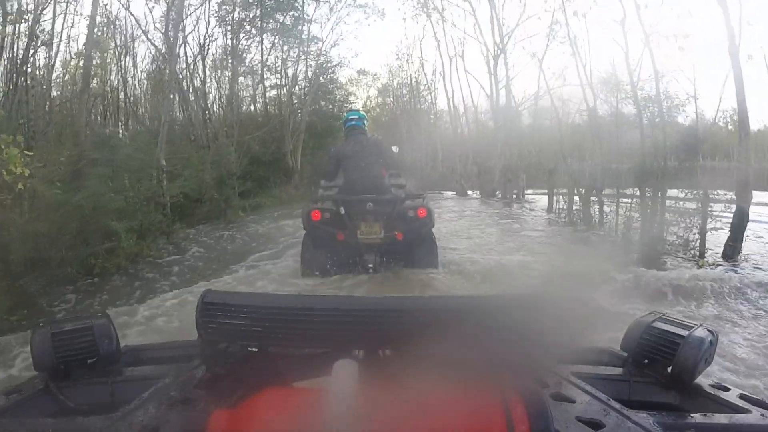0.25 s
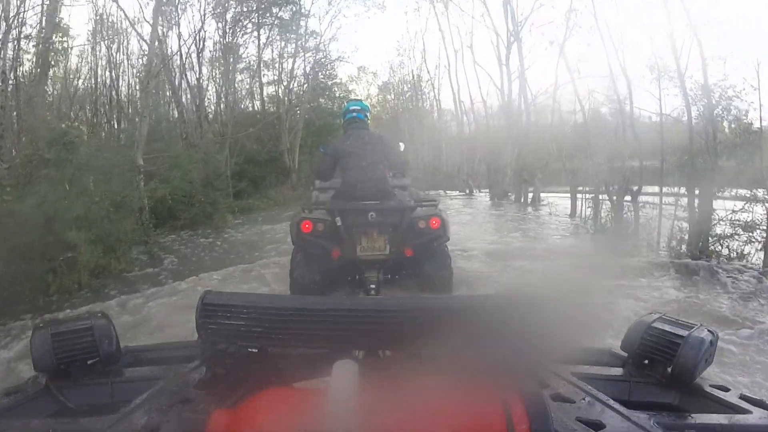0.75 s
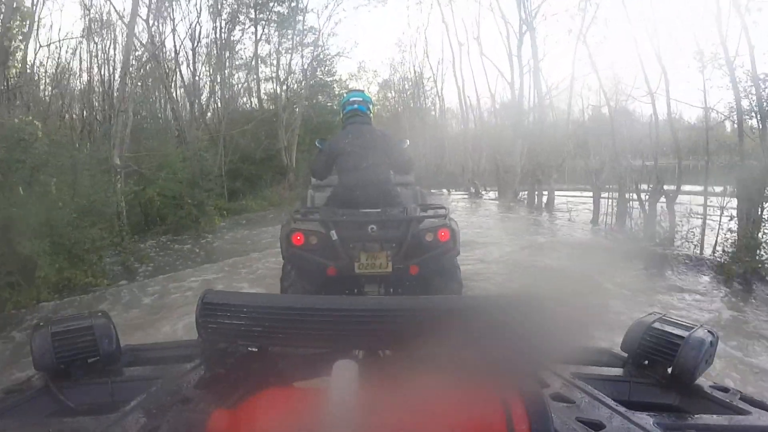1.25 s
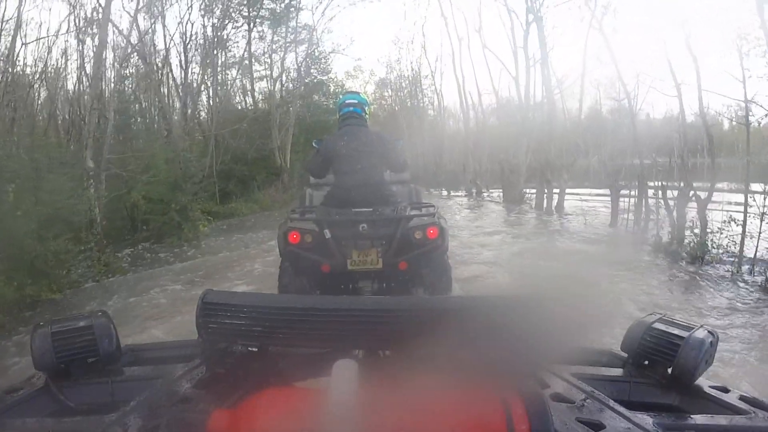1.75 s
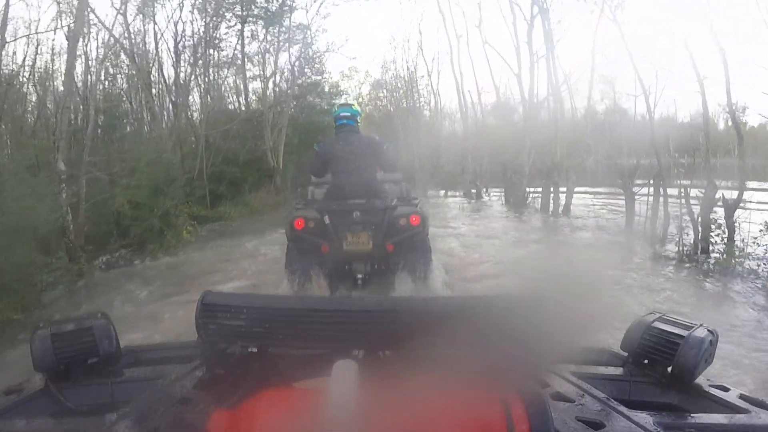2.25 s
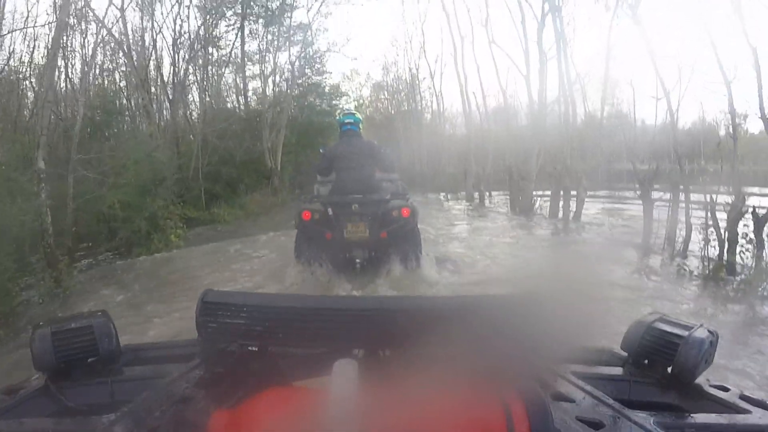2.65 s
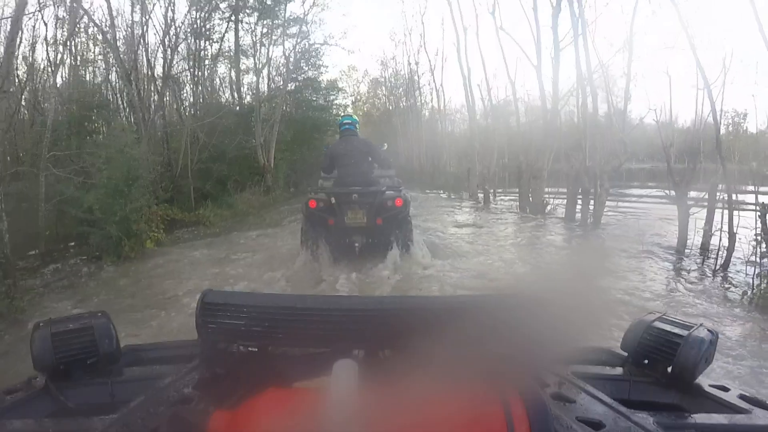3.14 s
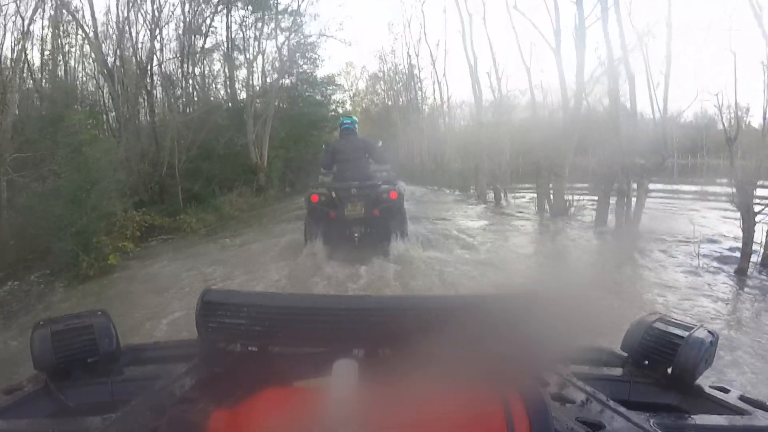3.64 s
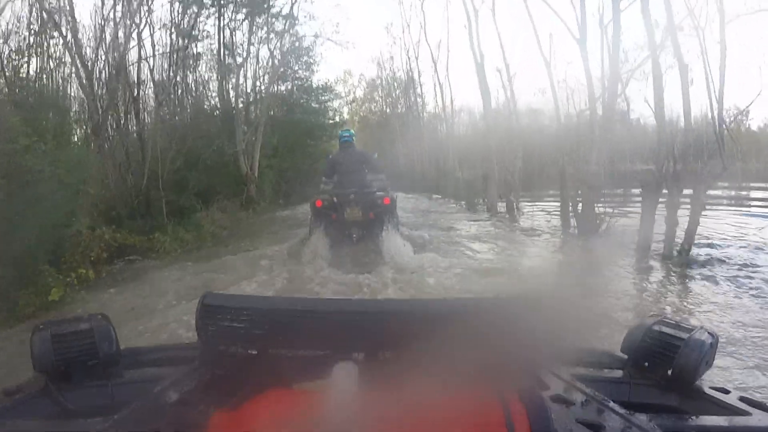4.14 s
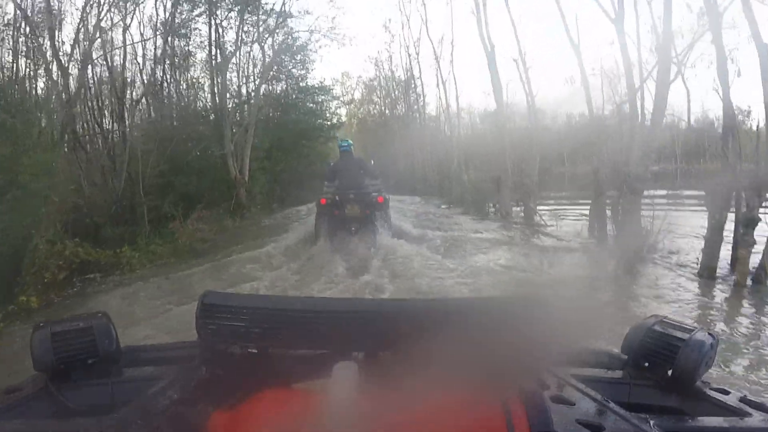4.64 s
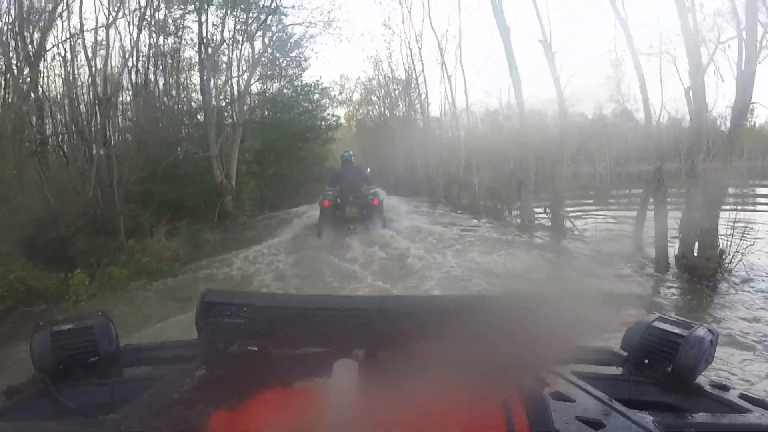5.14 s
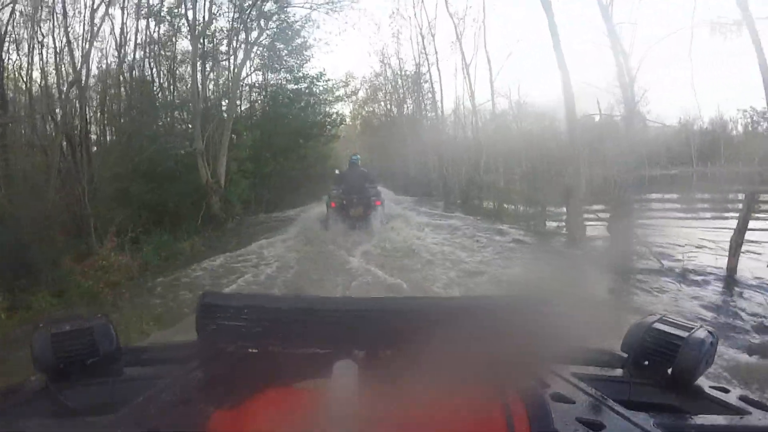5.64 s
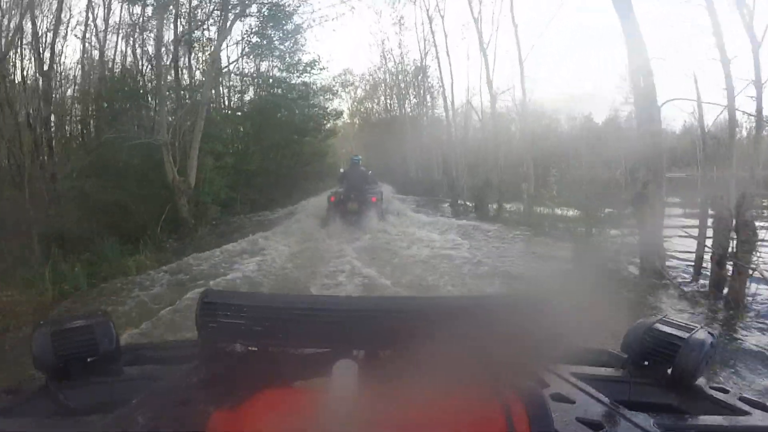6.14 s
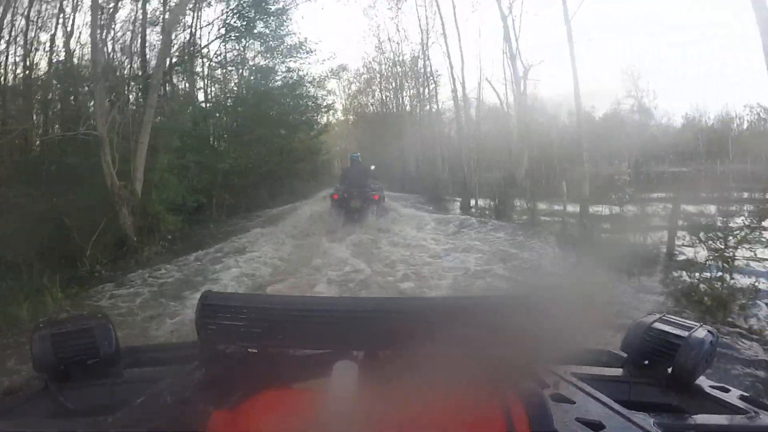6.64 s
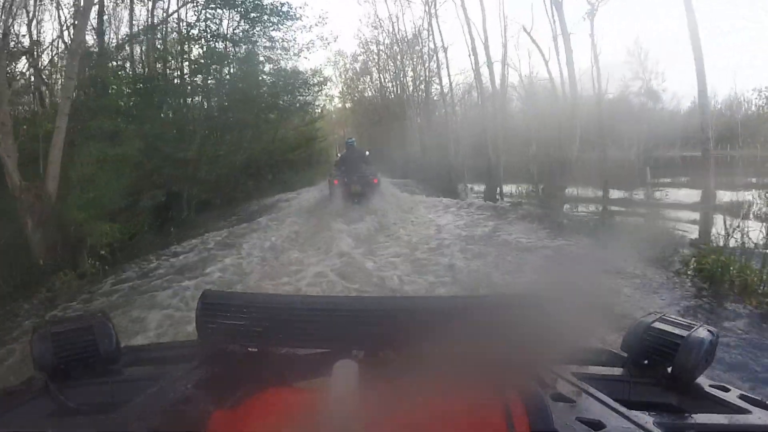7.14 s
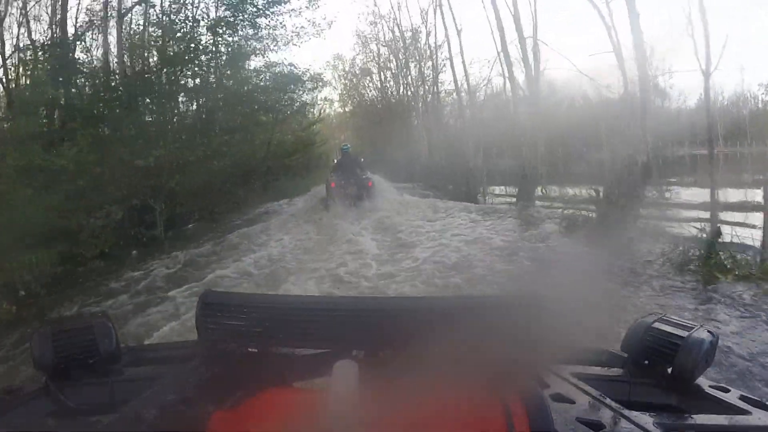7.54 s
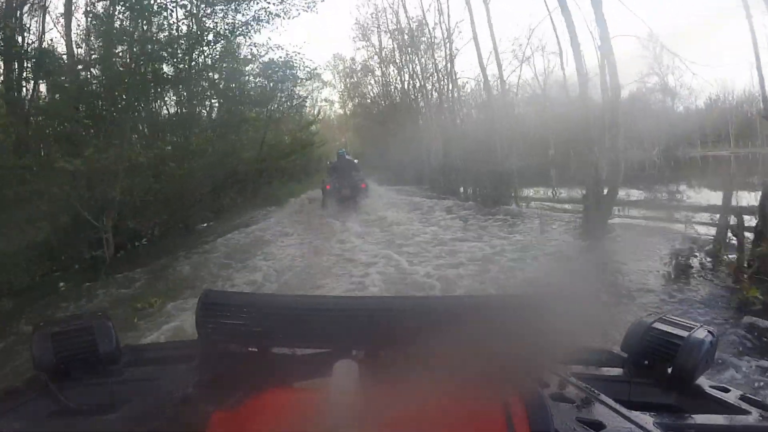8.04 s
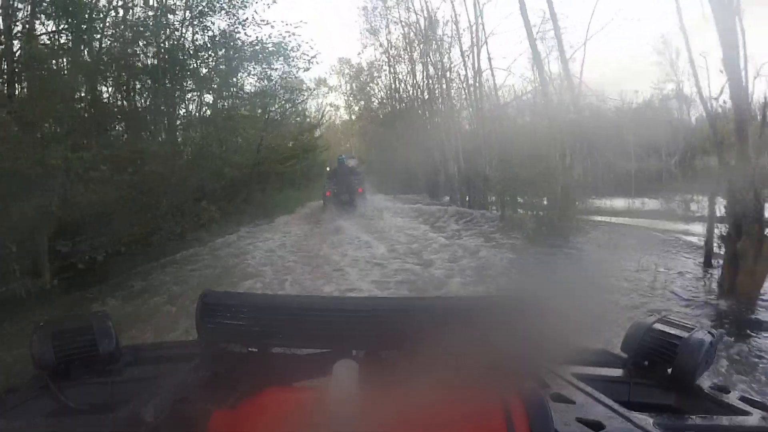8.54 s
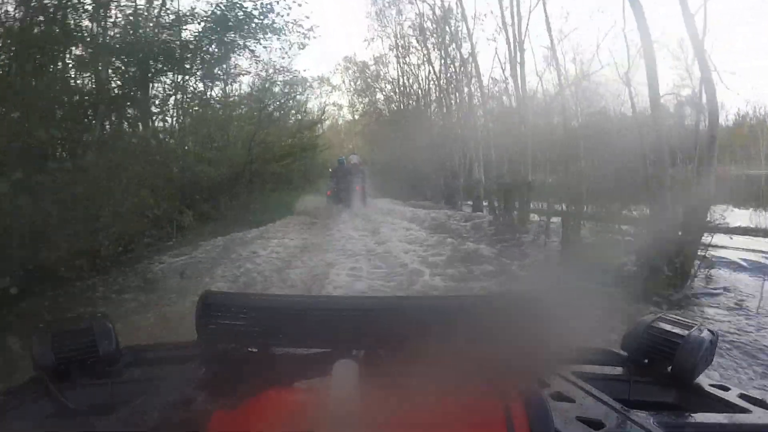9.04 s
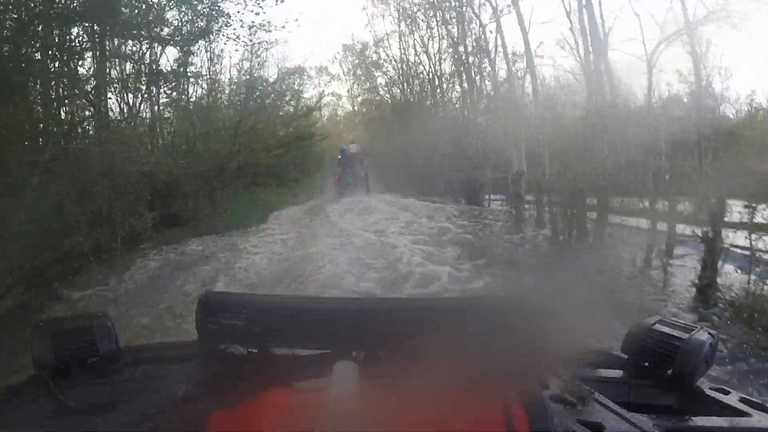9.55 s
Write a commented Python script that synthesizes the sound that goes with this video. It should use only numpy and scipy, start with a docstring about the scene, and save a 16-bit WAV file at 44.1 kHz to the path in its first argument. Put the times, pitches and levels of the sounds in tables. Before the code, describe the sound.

Close and muffled, from inside a sealed case fixed to a quad bike: a low, uneven idle thumps with metallic engine clatter and loose ticking for about two seconds. Then the drive grips and the engine smooths into a strong bass drone, rising steadily. Water rumbles and washes around the machine, with dull thuds and a rough gear whine joining from about five seconds outdoors on a flooded trail.

```python
"""A lumpy idle thumps first, with clatter and loose ticks; the clutch grips and a twin-cylinder quad bike
speeds up through floodwater. Harmonics of the engine cycle shake the frame; gated noise and struck notes
ring the engine cover; shaped noise is rumble, wash and water thuds; phase-modulated tones are gear whine.
The capsule sits in a sealed case bolted to the frame: resonances of the case colour wash and whine, and
the loose case rattles in its mount as impulses shaped into noisy ticks."""
import sys
import numpy as np
from scipy import signal
from scipy.fft import rfft, irfft, next_fast_len
from scipy.io import wavfile
from scipy.ndimage import uniform_filter1d, map_coordinates

SR = 44100
rng = np.random.default_rng(int(sys.argv[2]) if len(sys.argv) > 2 else 0)


def master_out(mix):
    """Clip the mix to full scale and print it as 16-bit PCM to the path in sys.argv[1]."""
    frames = np.transpose(np.atleast_2d(mix))
    ceiling = np.clip(frames, -1, 1)
    pcm = np.round(ceiling * 32767).astype(np.int16)
    wavfile.write(sys.argv[1], SR, pcm)


N = 431738

# Engine cycles, each of two crank turns: (t/s, f/Hz)
CYCLE_RATE = [(0.0, 13.699), (0.5, 11.365), (0.875, 13.134), (1.125, 12.37), (1.625, 12.172),
              (1.875, 10.928), (2.375, 15.518), (2.875, 17.96), (4.125, 16.155), (4.75, 17.637),
              (5.0, 19.599), (5.625, 21.874), (6.375, 26.129), (6.5, 27.109), (7.375, 28.465),
              (7.5, 27.993), (8.0, 27.421), (8.625, 28.767), (9.0, 30.197), (9.79, 32.363)]
# Source levels before fixed offsets: (t/s, frame shake level/dB, clatter level/dB, rattle level/dB)
SOURCE_LEVELS = [(0, -17.5, -42, -41), (.3, -13, -37.5, -49), (.9, -11.5, -37.5, -38.5),
                 (1.6, -12.5, -35.5, -47), (2.1, -10.5, -37, -44.5), (2.4, -8.5, -43.5, -46.5),
                 (2.7, -12, -43, -57), (3.9, -10, -40.5, -51), (4.5, -12.5, -41.5, -54.5),
                 (5.3, -10.5, -42.5, -47), (5.7, -9, -57, -45), (6, -12.5, -64, -46.5),
                 (6.5, -12, -48, -50), (7.7, -12.5, -53.5, -48.5), (8.4, -12, -50, -49),
                 (8.9, -11, -43.5, -47.5), (9.79, -12.5, -41.5, -47)]
# Engine load: (t/s, clutch grip 0-1, thump place/cycle, thump shape/turn, clatter place/cycle, sharpness)
ENGINE_LOAD = [(0, 0.16, 0.074, 0.33, -0.039, 1.1), (2.05, 0, 0.53, 0.21, -0.014, 2.4),
               (2.35, 0.93, 0.25, 0.49, -0.22, 4.5), (4.7, 0.99, 0.26, 0.46, -0.17, 2.8),
               (5.6, 0.93, 0.3576, 1, -0.32, 2), (8.5, 1, 0.34, 0.97, -0.12, 1.4),
               (9.79, 0.79, 0.39, 0.98, -0.21, 1.2)]
# Relative engine orders: (multiple of cycle rate, idle level/dB, then in gear: slow, cruising, fast level/dB)
ENGINE_ORDERS = [(1, -30, -10, -14, -8.5), (2, -5.5, 0, 0, 0), (3, -5, -12, -7.5, -4),
                 (4, -1, -8.5, -11.5, -12), (5, -2, -22, -22.5, -18), (6, -13, -15.5, -18, -17),
                 (7, -9.5, -24, -21.5, -24), (8, -8, -22, -21, -20.5), (9, -25, -25, -24.5, -22),
                 (10, -27, -30, -27.5, -25), (11, -24, -32, -32, -32), (12, -28, -37, -35, -34)]
# Cycle rates called slow, cruising and fast: (f/Hz, f/Hz, f/Hz)
GEAR_RATES = (22, 28, 31)
IDLE_THUMP_PLACE, TWIN_GAP = .71, 0.383  # share of a cycle: idling thump; gap between the cylinders
# Transmission from frame to capsule: (f/Hz, relative level/dB)
FRAME_PATH = [(10, -40), (18, -20), (32, 1), (55, 0), (90, 1), (140, 0), (248, 3.5), (264, -1), (400, -12)]

# Engine cover resonances: (f/Hz, width/Hz, level/dB); half-power width is 1.34 times the width given
COVER_RESONANCES = [(1056, 27, -11), (1347, 93, -2.5), (1508, 81, 2), (1630, 57, 2.5), (2340, 880, -19)]
COVER_TILT_DB = 2  # per octave about 1450 Hz: one cylinder rings the cover low, the other high
# Individually timed blows on the engine cover, strong and weak: (t/s, nominal peak level/dB, high ring 0-1)
TIMED_BLOWS = [(0.5672, -22, 0.55), (.651, -23, 0.4), (0.733, -22, 0.2), (.8077, -20.5, 0),
               (.985, -26, 0.6), (1.121, -23, .4), (1.196, -29, 0.9), (1.228, -29, 0.9),
               (1.286, -20.5, 0.2), (1.368, -33, .5), (1.39, -24, 0.6), (1.473, -32.5, 0.4),
               (1.529, -26, 0.2), (1.869, -40, 0.6), (1.897, -27, 0.9), (1.9576, -26, 0.9),
               (2.045, -26, .5), (2.118, -20.5, 0.46), (2.411, -22, 0.7), (3.605, -27, 0.5),
               (3.93, -25, 0.9), (4.47, -25.5, 0.05), (4.566, -28, 0)]
# Low and high note of a blow on the cover: (f/Hz, f/Hz)
COVER_NOTES = (1325, 1604)
RING_DB, RING_HIGH = 8, (.45, .8)  # ring over the clatter level, dB; share of high ring for each cylinder
CLANK_DECAY_S = 0.007  # time to fall by 1/e
# Band kept around the cover's ring: (lower f/Hz, upper f/Hz)
COVER_BAND = (1200, 1740)

# Relative rumble spectrum: (f/Hz, level/dB per Hz)
RUMBLE_SPECTRUM = [(12, -20), (22, -0.5), (60, 11.5), (110, -0.5), (160, -0.5), (280, -9), (370, -21),
                   (450, -39), (700, -70), (3000, -120)]
DEEP_HZ, DEEP_LOSS_DB = 130, 4  # rumble below this thins out, per doubling of speed
# Growth with engine speed: (level/dB at 20 cycles a second, rise/dB per doubling of speed)
RUMBLE_GROWTH = (-23.5, 2.9)
WASH_GROWTH = (-46.5, 4.55)
# Surge of water against the machine, lifting rumble and wash alike: (t/s, level/dB)
WATER_SURGE = [(0, 0), (.8, 5.5), (2.2, 6.5), (2.8, 1.5), (3.7, 4), (4.4, 2.5), (5.4, 5.5), (6.1, 1.5),
               (7.5, 0.5), (8.7, 4), (9.79, 4.5)]
# Case resonances: (f/Hz, width/Hz, level/dB); half-power width is 1.34 times the width given
CASE_RESONANCES = [(1027, 66, -5), (1320, 143, 1.5), (1545, 156, -1), (2500, 630, -10.5), (3880, 67, -23)]
# Dull path through the case wall: (f/Hz, level/dB per Hz)
WALL_PATH = [(200, -40), (450, -5), (800, -3.5), (930, -13), (1800, -14.5), (3000, -16.5), (4300, -21.5),
             (6400, -27), (8000, -34.5), (11000, -47), (17000, -110)]

# Relative rattle spectrum: (f/Hz, level/dB per Hz)
RATTLE_SPECTRUM = [(1500, -30.5), (2500, -8.5), (3200, -18), (3640, -9.5), (4300, -19.5), (6400, -5.5),
                   (8000, -12.5), (10200, -30.5), (12700, -33.5), (16300, -60.5)]
# Individually timed knocks of the case: (t/s, nominal peak level/dB)
TIMED_KNOCKS = [(0.0392, -34), (0.112, -30), (0.191, -34.5), (.2735, -26.5), (0.3634, -26.5),
                (0.449, -22.5), (0.704, -28), (0.7848, -20), (0.853, -28), (0.862, -22), (0.929, -26.5),
                (0.9463, -32.5), (0.9528, -34.5), (1.005, -28), (1.012, -25.5), (1.0198, -31.5),
                (1.098, -31.5), (1.176, -26), (1.255, -32), (1.3408, -27.5), (1.416, -26), (1.499, -35.5),
                (1.581, -31.5), (1.666, -27.5), (1.8319, -25.5), (1.8404, -25), (1.927, -33.5),
                (2.0966, -26), (2.1606, -23), (2.252, -26.5), (2.309, -25.5), (2.386, -29.5),
                (2.607, -29.5), (2.706, -34), (2.767, -28), (2.945, -31.5), (3.0303, -30.5), (3.246, -28),
                (3.2753, -30), (3.447, -36), (3.683, -37), (3.77, -36.5), (3.802, -32), (3.832, -32),
                (3.938, -32.5), (4.0896, -25.5), (4.293, -31.5), (4.339, -29.5), (4.368, -30.5),
                (4.529, -30), (4.673, -35), (4.818, -29), (4.892, -29), (4.9468, -26), (5.056, -24),
                (5.246, -24), (5.292, -25.5), (5.4747, -28), (5.5308, -22.5), (5.576, -25.5),
                (5.6237, -23.5), (5.7132, -24), (5.922, -27), (6.2469, -26.5), (6.558, -27.5),
                (8.1055, -26), (8.489, -31), (9.3039, -26), (9.534, -24.5)]
# Strikes of the case on its mount: (place/cycle, slow level/dB, fast level/dB), over the rattle level
IDLE_MOUNT_STRIKES = [(.05, -7, -8), (.3, -11, -14), (.58, 8, 7), (.68, 11, 10), (.76, 8.5, 5),
                      (.84, -8, 1)]
GEAR_MOUNT_STRIKES = [(.125, 13, 9.5), (.375, 14, 14), (.46, 3, 7), (.58, 14.5, 16), (.74, -6, 9),
                      (.87, 11, 5.5)]
# Strikes come earlier at speed: (t/s, lead/cycle)
STRIKE_ADVANCE = [(4.7, 0), (5.3, .06), (5.9, .1), (8.8, .1), (9.79, .14)]
STRIKE_SPREAD_DB, STRIKE_SCATTER = 2.4, .009  # standard deviations: dB; share of a cycle
BRIGHT_HZ, BRIGHT_SPREAD_DB = 9000, 3.5  # the top of the ticks above this varies in level

# Water thuds on the footwells: (t/s, level/dB)
CHURN_LEVEL = [(0, -54.5), (4.8, -46.5), (5.3, -40.5), (5.7, -34.5), (6.2, -36), (7, -42), (8.6, -39.5),
               (9.1, -38), (9.5, -48), (9.79, -43)]
# Footwell resonances: (f/Hz, width/Hz, relative level/dB); half-power width is 1.34 times the width given
FOOTWELL_RESONANCES = [(274, 115, 0.5), (370, 34, -11.5)]
# Gear whine before offsets and the case: (t/s, tone level/dB, octave level/dB, faster pair level/dB)
WHINE_LEVELS = [(4.7, -75, -67, -78), (5, -54, -40, -55), (5.2, -47, -35, -45), (5.45, -49, -34, -40.5),
                (5.62, -43, -39, -40), (5.95, -56, -44, -48), (6.15, -50, -40, -38), (6.4, -50, -39, -60),
                (7, -41.5, -47, -61), (8.2, -54.5, -48.5, -57), (8.6, -43, -50, -67), (9.1, -36, -39, -53),
                (9.79, -41, -57, -60)]
# The belt drive gears up, then holds: (t/s, gear teeth meshing per engine cycle)
BELT_RATIO = [(5, 33.2), (5.3, 38), (6.2, 41.5), (6.5, 40.8), (7, 41.5), (9.1, 41.8), (9.79, 40)]
# The microphone's own noise: (f/Hz, level/dB over white noise of rms 1)
HISS_SPECTRUM = [(3000, -120), (8000, -66), (12000, -75), (16000, -99)]
TOP_HZ = 16440  # band limit


def amp(db):
    """Level definition: amplitude gain of a level in dB."""
    return 10 ** (np.asarray(db) / 20)


def unit(x):
    """Normalisation: x scaled to rms 1."""
    return x / np.sqrt(np.mean(x ** 2) + 1e-20)


def along(points, hz):
    """Logarithmic frequency scale: (f/Hz, value) points interpolated along it."""
    f, v = np.transpose(points)
    return np.interp(np.log(hz + 1), np.log(f + 1), v)


def curves(rows):
    """Linear interpolation: one value per sample for each column after the time."""
    s, *cols = np.transpose(rows)
    return [np.interp(np.arange(N) / SR, s, c) for c in cols]


def wobble(rate):
    """Random fluctuation: a smooth curve through rate random knots a second."""
    knots = rng.standard_normal(int(N * rate / SR) + 4)
    return map_coordinates(knots, [np.arange(N) * rate / SR])


def filtered(x, response):
    """Convolution theorem: the spectrum of x times a response of frequency."""
    m = next_fast_len(N + 8192)
    return irfft(rfft(x, m) * response(np.fft.rfftfreq(m, 1 / SR)), m)[..., :N]


def modes(table, hz):
    """Modal superposition: summed power response of steep-sided resonances."""
    return sum(amp(2 * db) / (1 + (2 * (hz - c) / (1.34 * w)) ** 6) for c, w, db in table)


def shake(cycle):
    """Fourier synthesis of engine orders: a ringing thump per cycle at idle, crank imbalance once in gear."""
    (hz,), (grip, place, shape, _, _) = curves(CYCLE_RATE), curves(ENGINE_LOAD)
    total = np.zeros(N)
    for k, idle_db, *gear_db in ENGINE_ORDERS:
        drift = .03 * max(k - 2, 0) * wobble(1.5)  # turns: high orders reach the mount by changing paths
        idle_turns = k * (cycle - IDLE_THUMP_PLACE) + drift
        idle = -amp(idle_db) * np.cos(2 * np.pi * idle_turns)
        gear_turns = k * (cycle - place) + shape + drift
        gear = amp(np.interp(hz, GEAR_RATES, gear_db)) * np.cos(2 * np.pi * gear_turns)
        uneven_db = (2.8 - 2.2 * grip) * wobble(12)  # no two firings are alike, least of all at idle
        path = amp(along(FRAME_PATH, k * hz) + uneven_db)
        total += path * ((1 - grip) * idle + grip * gear)
    local_power = uniform_filter1d(total ** 2, SR // 3)
    return total / np.sqrt(np.abs(local_power))


def cover_ring(hz):
    """Modal excitation: responses of the cover tilted low for one cylinder and high for the other."""
    octaves = np.clip(np.log2((hz + 1) / 1450), -.4, .4)
    tilt = amp(np.outer([-1, 1], COVER_TILT_DB * octaves))
    return np.sqrt(modes(COVER_RESONANCES, hz)) * tilt


def clatter(cycle):
    """Gated excitation: each cylinder shakes the cover once a cycle, in bursts of varying sharpness."""
    *_, place, sharp = curves(ENGINE_LOAD)

    def burst(since):
        """Transient envelope: a quick rise and exponential decay along the cycle."""
        return (1 - np.exp(-since / 0.035)) * np.exp(-2.2 * sharp * since)

    gates = np.array([burst((cycle - place - at + 0.049) % 1) for at in (0, TWIN_GAP)])
    gates = gates * amp(0.71 * wobble(30))
    local_power = uniform_filter1d((gates ** 2).sum(0), SR // 3)
    gates = gates / np.sqrt(np.abs(local_power))
    noise = rng.standard_normal((2, N))
    return unit(filtered(gates * noise, cover_ring).sum(0))


def clanks(cycle, clatter_db):
    """Impulse response: firings ring two decaying notes of the cover; some blows are placed one by one."""
    out, t = np.zeros(N + SR), np.arange(SR // 24) / SR
    *_, place, sharp = curves(ENGINE_LOAD)
    blows, timed = list(TIMED_BLOWS), np.transpose(TIMED_BLOWS)[0]
    for gap, high in zip((0, TWIN_GAP), RING_HIGH):
        firings = np.flatnonzero(np.diff(np.floor(cycle - place - gap + .04)) > 0)
        luck = rng.standard_normal((len(firings), 2))
        for i, (level_luck, note_luck) in zip(firings, luck):
            if np.min(np.abs(timed - i / SR)) > .015:  # a timed blow takes the place of a usual one
                blows.append((i / SR, clatter_db[i] + RING_DB + 1.5 * level_luck, high + .2 * note_luck))
    envelope = (1 - np.exp(-t / 0.0019)) * np.exp(-t / CLANK_DECAY_S)
    for s, db, high in blows:
        share = np.sqrt(np.clip([1 - high, high], 0, 1))  # power shared between the notes
        hz = np.array(COVER_NOTES) * (1 + .018 * rng.standard_normal(2))
        notes = share @ np.sin(2 * np.pi * np.outer(hz, t))
        out[round(s * SR):][:len(t)] += amp(db + 3.5) * envelope * notes
    low, high = COVER_BAND

    def band(hz):
        """Band-pass: steep skirts keep the ring within the cover's own band."""
        return 1 / np.sqrt((1 + (hz / high) ** 40) * (1 + (low / (hz + 1)) ** 12))

    return filtered(out[:N], band)


def rumble(speed):
    """Random forcing: water and ground push the frame about; the slowest heaving thins out at speed."""
    noise = rng.standard_normal(N) * amp(1.2 * wobble(14))
    push = unit(filtered(noise, lambda hz: amp(along(RUMBLE_SPECTRUM, hz))))
    deep = filtered(push, lambda hz: 1 / (1 + (hz / DEEP_HZ) ** 4))
    doublings = np.log2(np.maximum(speed, 14) / 14)  # above 14 cycles a second
    return push - deep * (1 - amp(-DEEP_LOSS_DB * doublings))


def case(hz):
    """Parallel transmission: the sealed case passes a dull wall path plus its resonances, added in power."""
    return np.sqrt(modes(CASE_RESONANCES, hz) + amp(2 * along(WALL_PATH, hz)))


def wash():
    """Turbulent noise: water churns past the machine in lumps, heard through the case."""
    lumps = amp(0.087 * wobble(24) + 2.0 * wobble(70))
    return unit(filtered(lumps * rng.standard_normal(N), case))


def rattle(cycle, level_db):
    """Intermittent contact: the case strikes its mount a few times a cycle, a sharp tick in a short scrape."""
    grip, (lead,), (speed,) = curves(ENGINE_LOAD)[0], curves(STRIKE_ADVANCE), curves(CYCLE_RATE)
    blows = np.zeros(N + SR)
    level_db = level_db + 1.2 * wobble(6) + 1.5 * wobble(20)  # the play in the mount changes
    for strikes, on in ((IDLE_MOUNT_STRIKES, grip < .5), (GEAR_MOUNT_STRIKES, grip >= .5)):
        for place, slow_db, fast_db in strikes:
            at = np.flatnonzero((np.diff(np.floor(cycle + lead - place)) > 0) & on[1:])
            luck = rng.standard_normal((len(at), 3))
            strike_db = np.interp(speed[at], [18, 24], [slow_db, fast_db])
            size = amp(level_db[at] + strike_db + STRIKE_SPREAD_DB * luck[:, 0])
            at = np.abs(at + STRIKE_SCATTER * luck[:, 1] * SR / speed[at]).astype(int)
            np.add.at(blows, at, size)
            bounce = size * amp(-15 + 4 * luck[:, 2])
            np.add.at(blows, at + round(.004 * SR), bounce)
    for s, db in TIMED_KNOCKS:
        blows[round(s * SR) - 130:][:260] = 0  # a timed knock takes the place of the usual tick
        blows[round(s * SR)] = amp(db)
    t = np.arange(-SR // 50, SR // 50 + 1) / SR
    scrape = np.exp(-np.abs(t) / np.where(t < 0, .0008, .001))  # s: rise before the tick, fall after
    touch = 2.4 * (t == 0) + .42 * scrape
    contact = np.abs(signal.fftconvolve(blows, touch, "same")[:N])
    grit = np.sign(rng.standard_normal(N))

    def colour(hz):
        """Spectral shaping: the gain of the rattle at each frequency."""
        return amp(along(RATTLE_SPECTRUM, hz))

    ticks = filtered(contact * grit, colour) / np.std(filtered(grit, colour))
    top = filtered(ticks, lambda hz: hz > BRIGHT_HZ)
    return ticks + top * (amp(BRIGHT_SPREAD_DB * wobble(50)) - 1)


def churn():
    """Resonant response to random forcing: heavier water drums on the footwells."""
    thuds = rng.standard_normal(N) * amp(3.1 * wobble(30))
    drum = filtered(thuds, lambda hz: np.sqrt(modes(FOOTWELL_RESONANCES, hz)))
    return amp(curves(CHURN_LEVEL)[0]) * unit(drum)


def whine(cycle):
    """Gear meshing: tones at the tooth rate and its octave, and two other pairs, all unsteady in phase."""
    tone_db, octave_db, fast_db = curves(WHINE_LEVELS)
    hz = curves(CYCLE_RATE)[0] * curves(BELT_RATIO)[0]
    turn = 2 * np.pi * np.cumsum(hz * (1 + .032 * wobble(220))) / SR  # radians
    teeth = amp(tone_db + 2 * wobble(40)) * np.sin(turn + .6 * wobble(150))
    teeth += amp(octave_db - 1.5 + 2 * wobble(45)) * np.sin(2 * turn + .5 * wobble(120))
    # a second, slower gear pair
    teeth += amp(tone_db - 8.0 + 1.5 * wobble(40)) * np.sin(.805 * turn)
    # a faster gear pair, strongest between 5 and 6.2 s
    teeth += amp(fast_db + 4 * wobble(50)) * np.sin(3.14 * turn + 1.2 * wobble(150))
    pulse = amp(1 + 3 * np.cos(4 * np.pi * cycle))  # the load on the teeth beats with the crank
    return filtered(teeth * pulse, case)


def scene():
    """Linear superposition: every source adds at one capsule."""
    shake_db, clatter_db, rattle_db = curves(SOURCE_LEVELS)
    (speed,), (surge_db,) = curves(CYCLE_RATE), curves(WATER_SURGE)
    cycle = np.cumsum(speed) / SR

    def water(db, growth_db):
        """Power law: gain rising with each doubling of speed, lifted by the surge."""
        return amp(db + growth_db * np.log2(speed / 20) + surge_db)

    body = amp(shake_db) * shake(cycle)
    body += water(*RUMBLE_GROWTH) * rumble(speed)
    body += churn()
    air = amp(clatter_db - 2.5) * clatter(cycle)
    air += water(*WASH_GROWTH) * wash()
    air += whine(cycle)
    air += clanks(cycle, clatter_db)
    hiss = filtered(rng.standard_normal(N), lambda hz: amp(along(HISS_SPECTRUM, hz)))
    return (body + air + hiss + rattle(cycle, rattle_db))[None]


def record(dry):
    """Soft saturation and band limiting: loud swings round off; deepest bass and extreme treble are lost."""
    soft = dry / (1 + np.abs(dry / .88) ** 5) ** (1 / 5)
    soft = np.pad(soft, [(0, 0), (0, 8192)], "linear_ramp", end_values=soft[0, 0])  # no step at the ends
    return filtered(soft, lambda hz: (hz < TOP_HZ) / np.sqrt(1 + (15 / (hz + 1)) ** 6))


dry = scene()
out = record(dry)
master_out(out)
```